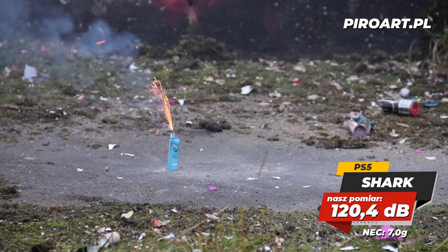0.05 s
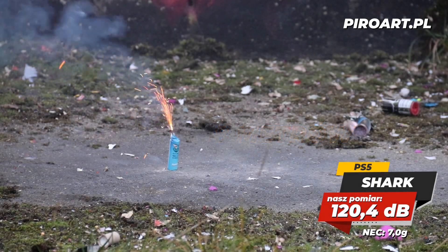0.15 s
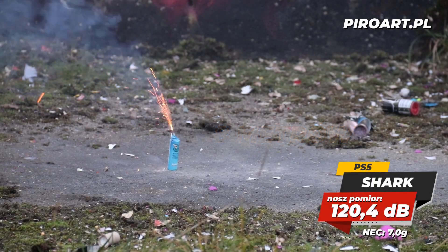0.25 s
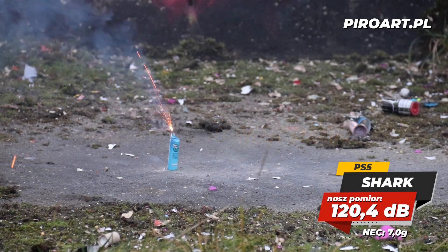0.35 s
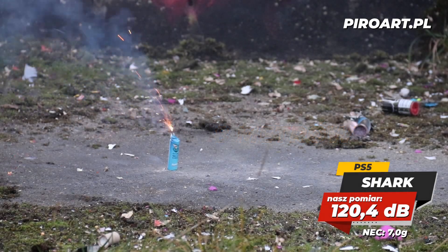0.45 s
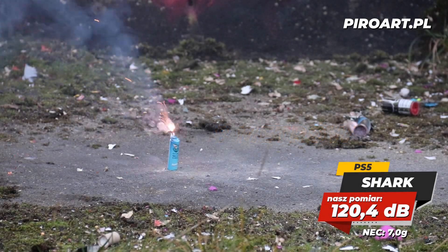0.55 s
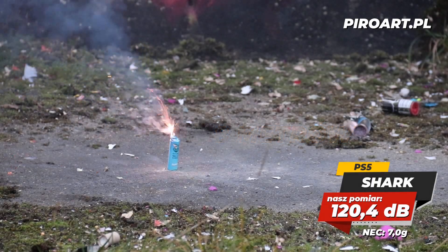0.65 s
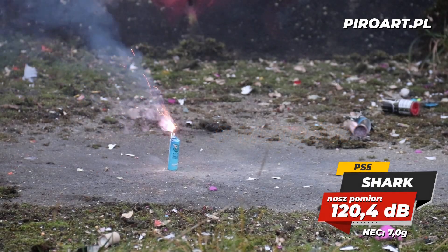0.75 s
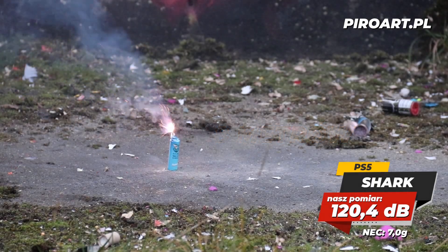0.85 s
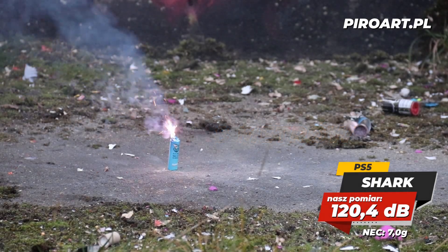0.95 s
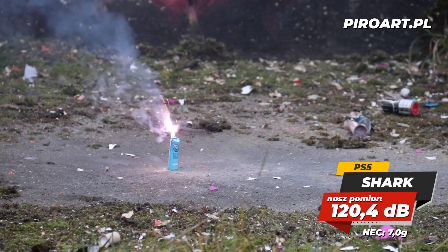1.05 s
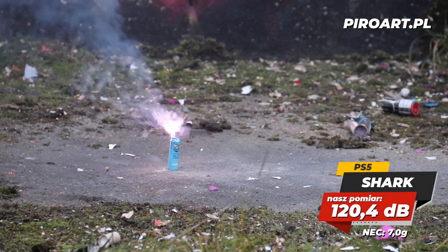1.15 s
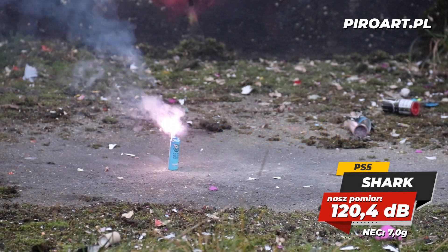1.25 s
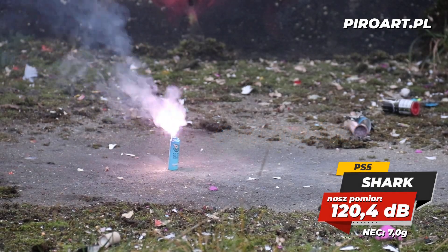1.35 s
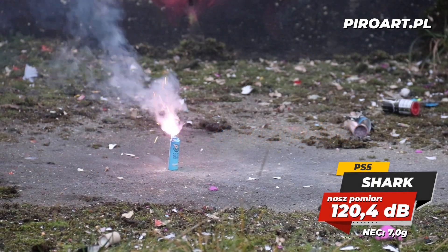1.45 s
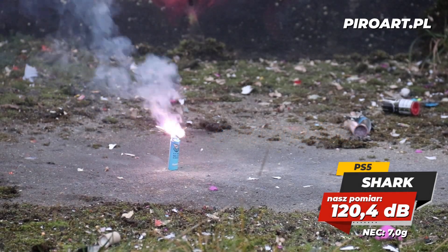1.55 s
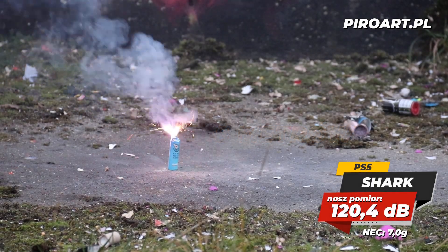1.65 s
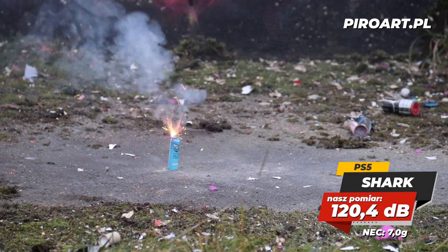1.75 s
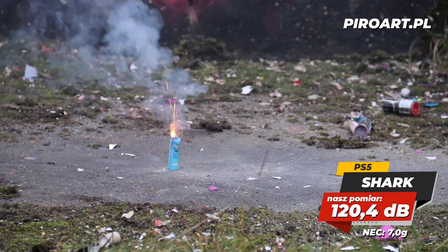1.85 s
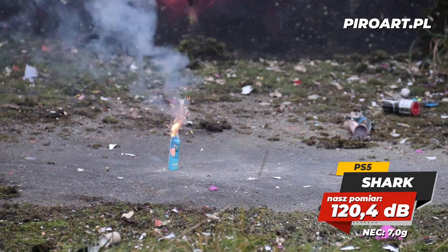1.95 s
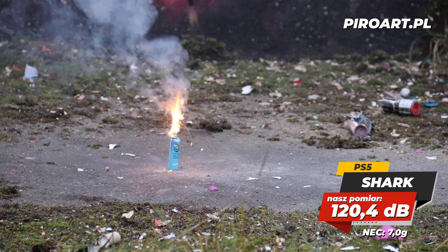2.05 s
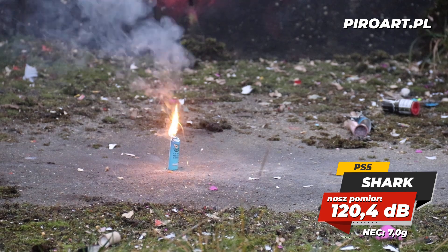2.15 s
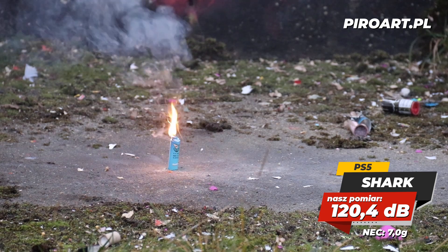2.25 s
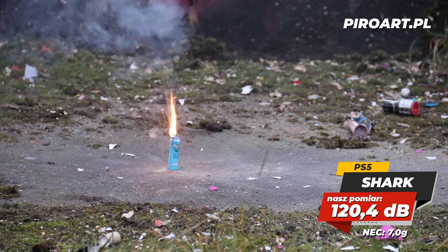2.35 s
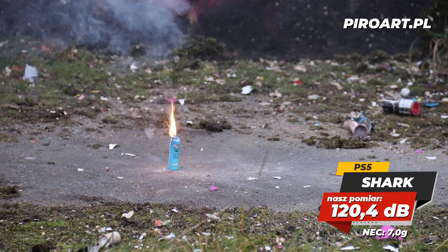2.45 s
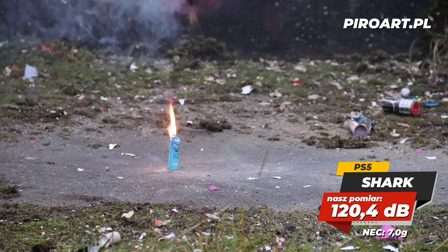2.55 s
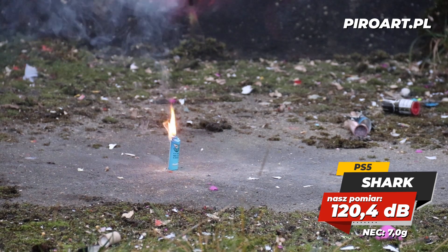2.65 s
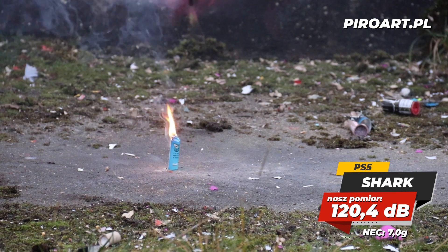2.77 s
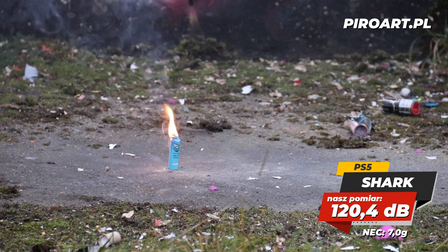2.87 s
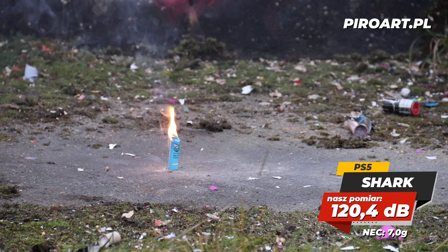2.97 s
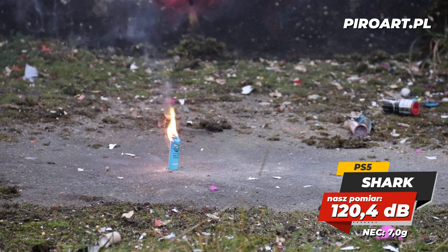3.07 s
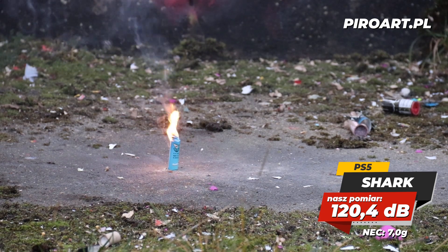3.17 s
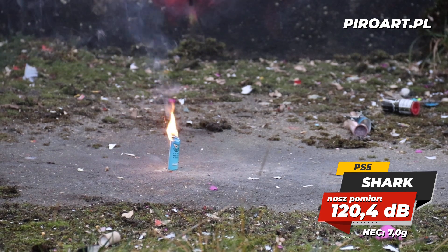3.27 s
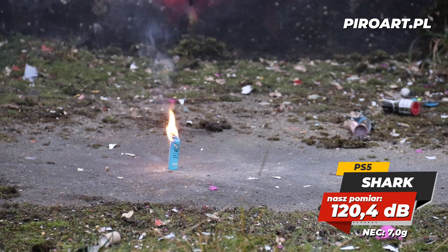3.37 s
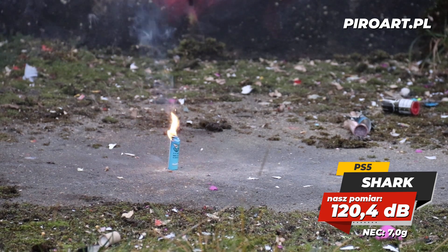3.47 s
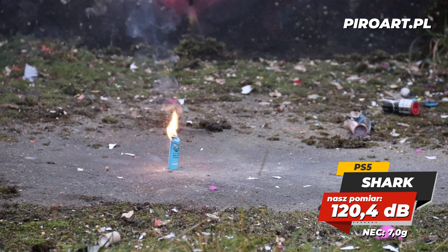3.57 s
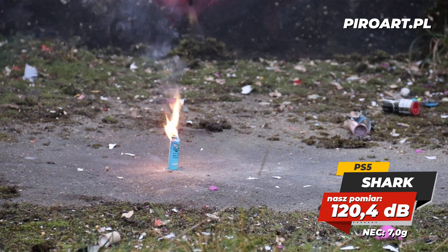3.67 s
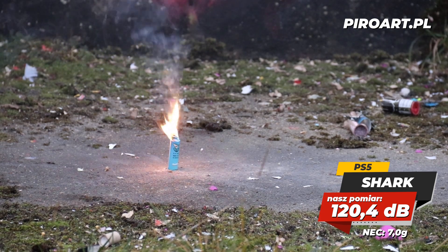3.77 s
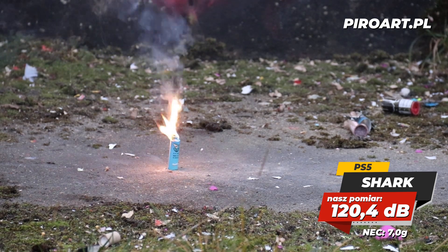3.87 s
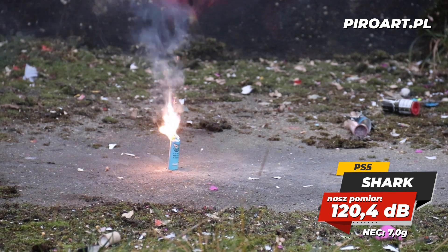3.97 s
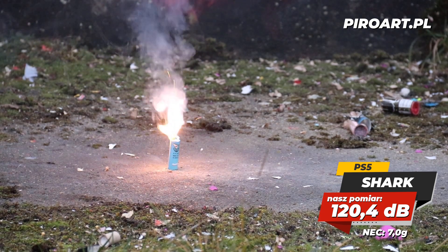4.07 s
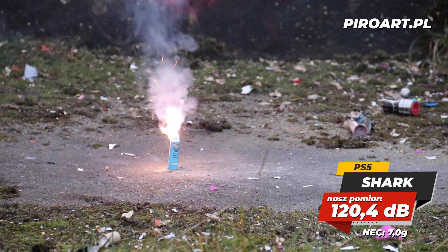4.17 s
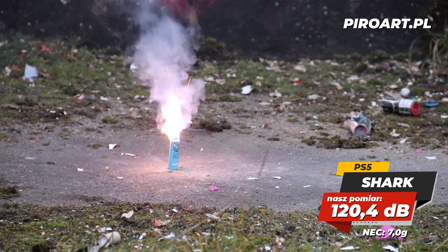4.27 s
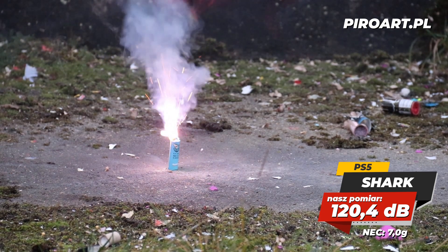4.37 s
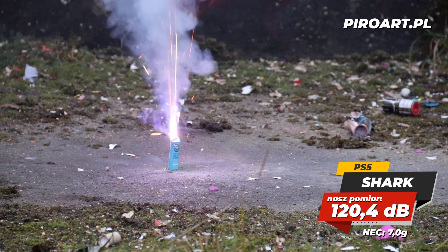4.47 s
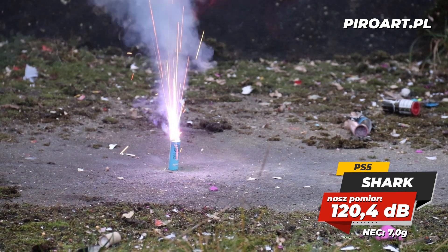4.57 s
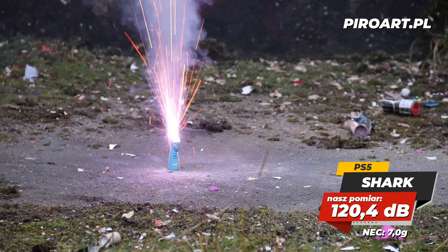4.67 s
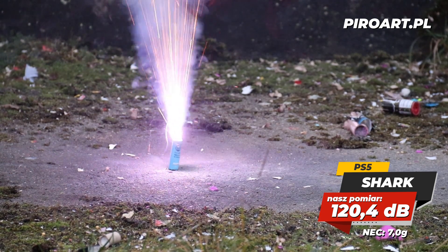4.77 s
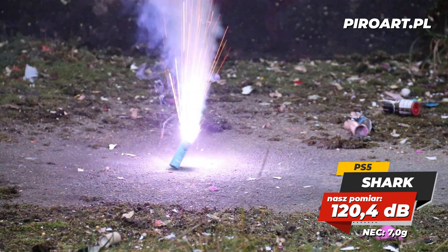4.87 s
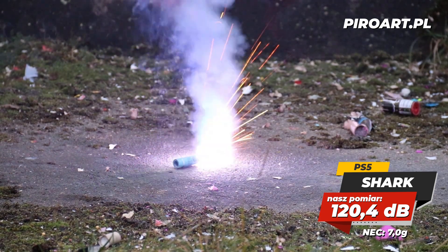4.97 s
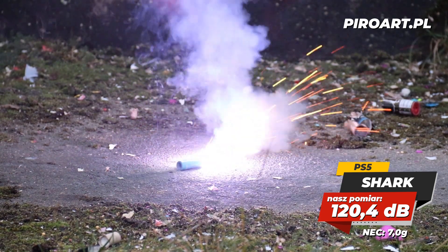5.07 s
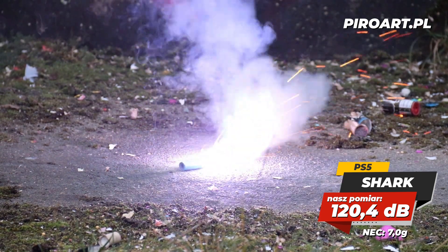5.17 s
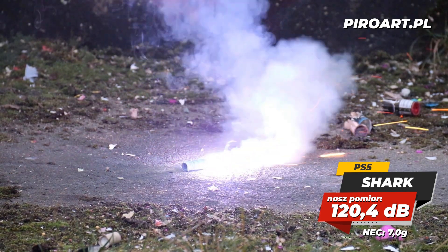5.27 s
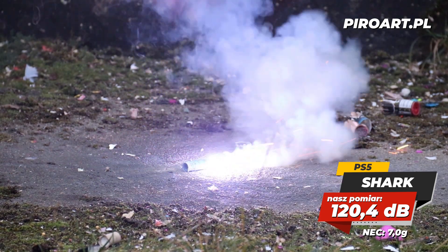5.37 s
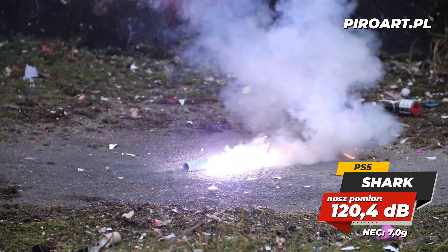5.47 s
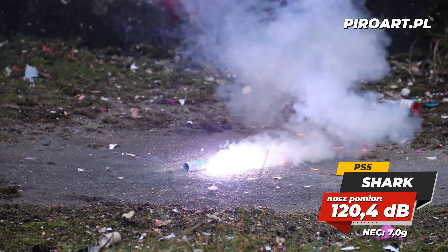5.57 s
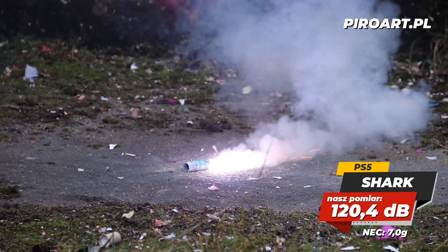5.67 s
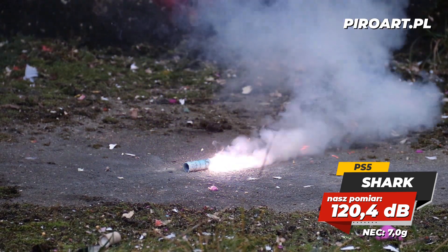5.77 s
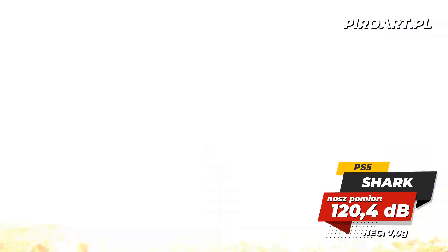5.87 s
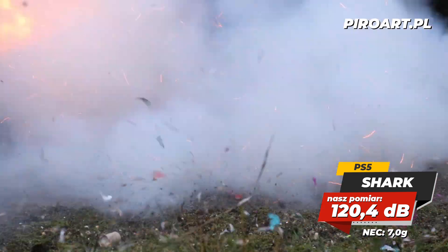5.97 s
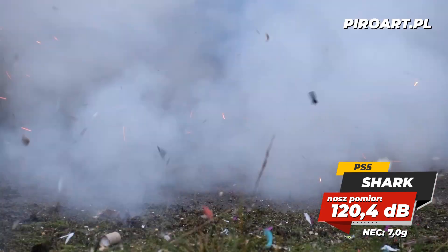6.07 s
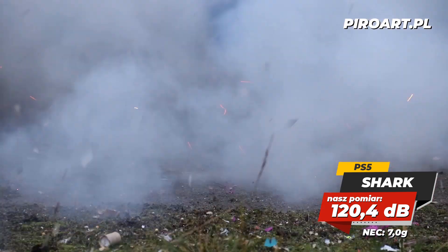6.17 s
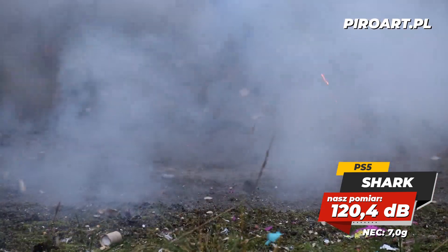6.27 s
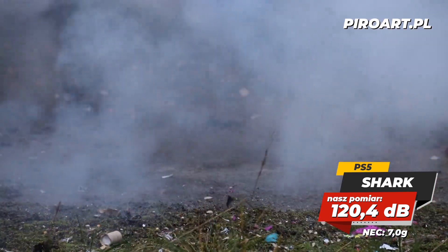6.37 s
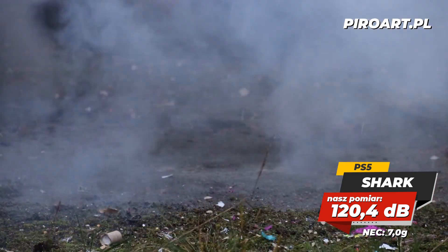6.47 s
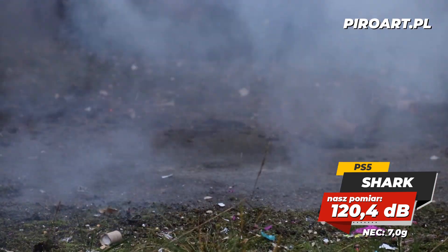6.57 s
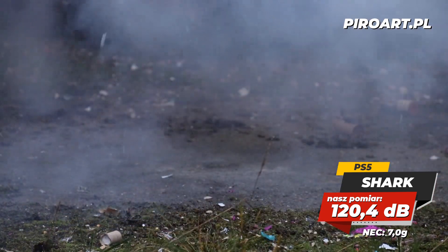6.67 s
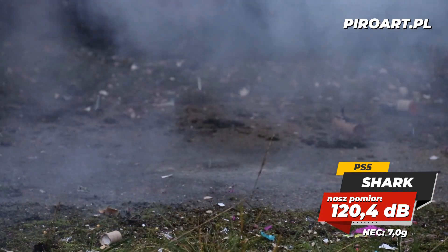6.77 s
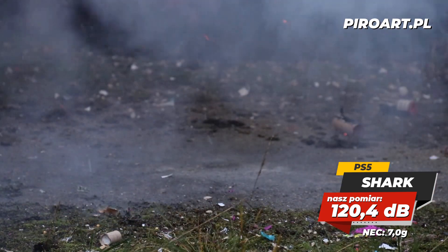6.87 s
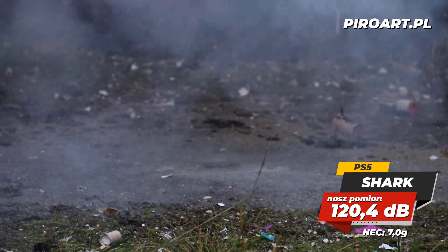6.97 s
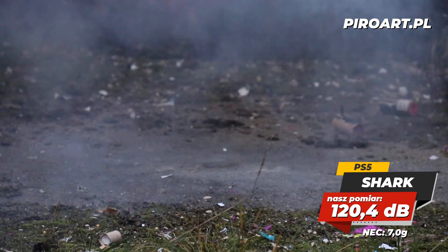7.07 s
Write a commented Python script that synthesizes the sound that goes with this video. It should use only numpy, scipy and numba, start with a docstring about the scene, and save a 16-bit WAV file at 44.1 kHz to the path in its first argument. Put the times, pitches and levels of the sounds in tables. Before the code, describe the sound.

A fuse sputters and hisses, sinks low, revives, then flares into a roaring jet before one enormous, distorted bang and echoes rolling outdoors.

```python
"""A firecracker stands on pavement in front of a wall: its fuse, band-split noise, sputters, spits and ticks.
The fuse sinks to a small flame, revives, then flares into a roaring jet that tips the tube over.
The charge explodes as a volley of pressure shocks with noisy cracks; the blast overloads the microphone and
the gain control ducks. Echoes roll back from far buildings and trees as surges of dark and clattering noise.
Faint outdoor air and microphone hiss lie underneath."""
import sys
import numpy as np
from scipy import signal
from scipy.fft import rfft, irfft, next_fast_len
from scipy.io import wavfile
from scipy.ndimage import uniform_filter1d, map_coordinates
from numba import njit

SR = 44100
rng = np.random.default_rng(int(sys.argv[2]) if len(sys.argv) > 2 else 0)


def inscribe(sig):
    """Save sig as 16-bit PCM at rate SR to the path in sys.argv[1].

    A 1-D sig is mono; a 2-D sig holds one channel per row.
    Samples are clipped to [-1, 1] before scaling.
    """
    pcm = np.round(np.clip(np.atleast_2d(sig).T, -1, 1) * 32767)
    wavfile.write(sys.argv[1], SR, pcm.astype(np.int16))


N = 314513

# the shock and its reflections from nearby walls: (start_s, relative level_db, crack_t60_s)
SHOCKS = [(5.9919, 17.5, 0.036), (5.999, 13, 0.014), (6.005, 13.5, 0.016), (6.019, 7.5, 0.021),
          (6.034, 14.5, 0.03), (6.041, 8.5, .03), (6.064, 11, 0.023), (6.09, -1.5, 0.031),
          (6.117, -3.5, 0.026), (6.14, -6, 0.06)]
BLAST_S = SHOCKS[0][0]
# colour of the boom in the yard and in the echoes: (freq_hz, relative level_db per Hz)
BOOM_COLOUR = [(40, -32.5), (110, -9), (155, -0.5), (175, -6.5), (195, 2.5), (215, -4), (250, 1.5),
               (330, -7), (430, -11.5), (520, -22.5), (900, -25), (3000, -74)]


def amp(db):
    """Decibels to gain."""
    return 10 ** (np.asarray(db) / 20)


def unit(x):
    """Scale to rms 1."""
    return x / np.sqrt(np.mean(x ** 2) + 1e-20)


def clock():
    """The time of every sample in seconds."""
    return np.arange(N) / SR


def gain_along(points, hz):
    """Gain of (freq_hz, level_db) points joined on a log frequency axis."""
    point_hz, db = np.transpose(points)
    return amp(np.interp(np.log(hz + 1), np.log(point_hz + 1), db))


def curves(rows):
    """One value per sample for each column after the time."""
    s, *columns = np.transpose(rows)
    return [np.interp(clock(), s, column) for column in columns]


def wobble(rate):
    """A smooth random curve, rate knots a second."""
    knots = rng.standard_normal(int(N * rate / SR) + 4)
    return map_coordinates(knots, [clock() * rate])


def ramp(start_s, length_s):
    """A straight rise from 0 to 1 over length_s."""
    return np.clip((clock() - start_s) / length_s, 0, 1)


def fade(start_s, t60_s):
    """Silence until start_s, then an exponential decay from 1."""
    age = clock() - start_s
    return (age >= 0) * amp(-60 * np.abs(age) / t60_s)


def swell(peak_s, rise_db_per_s, fall_db_per_s):
    """A gain that climbs to 1 at peak_s and sinks again."""
    age = clock() - peak_s
    return amp(-np.abs(age * np.where(age < 0, rise_db_per_s, fall_db_per_s)))


def filtered(x, response):
    """x shaped by a response of frequency, with padding for its tail."""
    size = next_fast_len(N + SR // 2)
    spectrum = rfft(x, size) * response(np.fft.rfftfreq(size, 1 / SR))
    return irfft(spectrum, size)[..., :N]


def noise(colour):
    """Coloured noise of rms 1."""
    return unit(filtered(rng.standard_normal(N), lambda hz: gain_along(colour, hz)))


def band(x, lo, hi):
    """One softly edged band of x, held near rms 1 over a quarter of a second."""
    y = filtered(x, lambda hz: 1 / (1 + (hz / hi) ** 10) - 1 / (1 + (hz / lo) ** 10))
    return y / np.sqrt(np.abs(uniform_filter1d(y ** 2, size=SR // 4)) + 1e-20)


def delayed(x, lag_rows):
    """x behind a moving lag, given as (time_s, lag_ms) rows."""
    lag_ms = curves(lag_rows)[0]
    return map_coordinates(x, [np.arange(N) - lag_ms * SR / 1000])


def widen(x, width):
    """Scattered sound, opposite in left and right, opens the stereo width frequency by frequency."""
    scatter = unit(rng.standard_normal(512)) / np.sqrt(512)  # unit energy
    scattered = signal.fftconvolve(x, scatter)[:N]
    side = filtered(scattered, lambda hz: gain_along(width, hz))
    return np.array([x + side, x - side])


def background(air_db, hiss_db):
    """Faint outdoor air, and the microphone's own hiss, unrelated between the channels."""
    # colour of the outdoor air: (freq_hz, relative level_db per Hz)
    air_colour = [(15, -34), (25, -11), (55, 2), (174, 1.5), (247, -1), (351, -1.5), (460, -3.5),
                  (586, -1.5), (2190, -9.5), (2800, -5), (4800, -16), (11100, -20.5), (15700, -22)]
    hiss_colour = [(100, 6), (2000, -8), (6000, -6.0), (15000, 3)]
    hiss = np.array([noise(hiss_colour) for channel in range(2)])
    return amp(air_db) * noise(air_colour) + amp(hiss_db) * hiss


def band_levels(strength_db, usual_db, before, after, change):
    """Roar, rush, hiss and fizz (dB) as a flame passes between two states; its strength drives the rush."""
    # moments when the fire sizzles brighter: (peak_s, gain_db, rise_db_per_s, fall_db_per_s)
    sizzle_rows = [(1.9, 5.5, 21, 28), (4.22, 3.5, 92, 90), (4.801, 10, 114, 73)]
    # share of that gain, one number (0 to 1) each for roar, rush, hiss, fizz
    sizzle_share = (0.023, 0.14, 0.7, 1)

    def follow_strength(state):
        return np.array([db + growth * (strength_db - usual_db) for db, growth in state])

    roar, hiss, fizz = (1 - change) * follow_strength(before) + change * follow_strength(after)
    sizzle_db = sum(db * swell(s, rise, fall) for s, db, rise, fall in sizzle_rows)
    return np.array([roar, strength_db, hiss, fizz]) + np.outer(sizzle_share, sizzle_db)


def flame(gas, levels, flutter_db, sputter_db):
    """Turbulent gas: the whole flame flutters, and grains of powder make its upper bands sputter."""
    # edges of roar, rush, hiss and fizz: edge_hz
    edges_hz = [10, 900, 4200, 11000, 24000]
    flutter = flutter_db * wobble(45)
    sputter = sputter_db * wobble(700)
    total = 0
    for level_db, lo, hi in zip(levels, edges_hz, edges_hz[1:]):
        motion_db = flutter + (lo > edges_hz[0]) * sputter
        total += amp(level_db) * unit(band(gas, lo, hi) * amp(motion_db))
    return total


def sparks(hiss_db, rate, level_db):
    """Tiny snaps of flying sparks, rate a second on average, following the fuse's hiss."""
    colour = [(400, -27), (2500, 14), (8000, -12), (15000, -10)]
    snaps = (rng.random(N) < rate / SR) * rng.exponential(size=N)
    snaps = filtered(snaps, lambda hz: gain_along(colour, hz))
    return amp(hiss_db + level_db) * unit(snaps)


def fuse(cap_reflection, enter_s, enter_length_s):
    """The cap's echo notches the hiss, climbing as the fuse shortens; inside the tube the fizz is muffled."""
    # colour of the fuse: (freq_hz, relative level_db per Hz)
    fuse_colour = [(30, -20), (70, -13), (150, -1), (300, 1), (600, -2.5), (950, -5), (1700, -1), (3400, 3),
                   (3900, -7.5), (4600, -10.5), (5700, -9), (8200, -10.5), (11300, -13), (14500, -10)]
    # lag of the echo off the tube's cap, shrinking as the fire burns down: (time_s, lag_ms)
    cap_lag = [(0, 0.15), (1.4, 0.13), (1.95, 0.11), (2.5, 0.09), (3.0, .062), (3.4, 0.05), (4.43, 0.027)]
    # how fiercely the fuse burns: (time_s, strength_db)
    burn_rows = [(0.0, -43), (0.73, -48), (0.78, -45.5), (1.33, -50.5), (1.37, -47), (1.87, -50),
                 (2.05, -48.5), (2.41, -61.5), (3.11, -62), (3.28, -50), (3.59, -54.5), (4.02, -53),
                 (4.06, -47.5), (4.24, -49.5), (4.43, -44)]
    # roar, hiss and fizz against strength: (level_db at usual strength, growth_db per dB)
    in_open = [(-49.5, 1.03), (-50.5, 1.0), (-55, 0.2)]
    in_tube = [(-49.5, 2), (-50, 0.64), (-72, 0.2)]
    small_flame_db = -61.5  # what stays when the fuse sinks
    gas = noise(fuse_colour)
    gas = gas + cap_reflection * delayed(gas, cap_lag)
    burn_db = 20 * np.log10(np.hypot(amp(curves(burn_rows)[0]), amp(small_flame_db)))
    inside = ramp(enter_s, enter_length_s)
    levels = band_levels(burn_db, -45, in_open, in_tube, inside)  # usual strength -45 dB
    return flame(gas, levels, flutter_db=0.9, sputter_db=1.04) + sparks(levels[2], rate=140, level_db=-21.5)


def spits(hiss_trim_db, puff_trim_db, attack_share):
    """Pockets of powder catch at once: a short hiss on a low puff."""
    # spits of burning powder, levels before trim: (start_s, hiss_db, puff_db, t60_s)
    spit_rows = [(0.752, -25, -41, 0.15), (0.82, -31, -38, .14), (0.925, -26, -28, 0.31),
                 (1.33, -41, -38.5, 1.44), (2.047, -26.5, -53, 0.12), (3.255, -31, -52, .35),
                 (3.43, -31, -55, 0.12), (4.1, -29, -49, .14), (4.152, -32, -31.5, .16),
                 (4.182, -25, -47, 0.1), (4.25, -31.5, -30.5, 0.6), (4.37, -26, -36, 0.13),
                 (4.44, -25, -25.5, .4), (5.152, -32, -22, 0.1), (5.205, -12, -23.5, 0.099),
                 (5.482, -9.5, -33.5, 0.18), (5.515, -28, -22, 0.29), (5.654, -25, -25, .14)]
    hiss = noise([(300, -25), (1500, 6), (3200, 6.5), (4400, -8.0), (8500, 0), (11000, -16.5), (15700, -32)])
    puff = noise([(50, -26), (120, 3.5), (300, 7.5), (650, -0.5), (1200, -16), (5000, -47.5)])
    total = 0
    for s, hiss_db, puff_db, t60 in spit_rows:
        envelope = ramp(s, attack_share * t60) * fade(s, t60)
        total += envelope * (amp(hiss_db + hiss_trim_db) * hiss + amp(puff_db + puff_trim_db) * puff)
    return total


def pops(trim_db, t60_s):
    """Single grains of powder burst with a dry tick."""
    # grains that pop sharply, levels before trim: (start_s, level_db)
    pop_rows = [(0.8254, -29), (1.4104, -40), (1.428, -41), (1.448, -35), (4.0686, -30), (4.167, -26),
                (4.1867, -27), (4.329, -27), (4.376, -32), (4.3982, -34)]
    tick = noise([(300, -16), (2500, 9), (4400, -14), (7500, 6), (10000, -17), (15000, -28.5)])
    return tick * sum(amp(db + trim_db) * fade(s, t60_s) for s, db in pop_rows)


def wall(x, reflection):
    """The wall's delayed echo combs the sound; its comb shifts upward as the tube falls, then settles."""
    # lag of the wall's echo, shorter once the tube tips over: (time_s, lag_ms)
    wall_lag = [(0, 7.75), (4.85, 7.71), (5.0, 7.45), (5.1, 7.17), (5.3, 7.38), (5.5, 7.46), (6, 7.46)]
    wall_colour = [(100, -4), (1000, -0.5), (3000, 1.0), (6000, -8.0), (14000, -15)]
    echo = filtered(x, lambda hz: gain_along(wall_colour, hz))
    return (x + reflection * delayed(echo, wall_lag)) / np.sqrt(1 + reflection ** 2)


def thrust(start_s):
    """Strength of the jet in dB: it builds, holds, and sinks steadily as the powder is spent."""
    attack_s, hold_s = 0.41, 0.14
    peak_db, sag_db_per_s = -20, 28
    built = np.maximum(ramp(start_s, attack_s), 0.01) ** 0.7  # steep at first, then easing
    spent_s = np.maximum(clock() - start_s - attack_s - hold_s, 0)
    return peak_db + 20 * np.log10(built) - sag_db_per_s * spent_s


def jet(start_s, fall_s, fall_length_s):
    """The jet brightens with its thrust, then dulls as that thrust tips the tube over."""
    # colour upright, and with the tube on its side: (freq_hz, relative level_db per Hz)
    upright_colour = [(40, -32), (125, -1), (300, 6), (660, 7), (950, -7), (1600, -3), (2750, -0.5),
                      (3450, -1), (3850, -9), (4600, -11), (5700, -7), (9300, -10), (10700, -17.5),
                      (15700, -21)]
    fallen_colour = [(40, -27), (130, -0.5), (300, 4.5), (660, 4), (950, -1.5), (1600, -0.5), (3000, -0.5),
                     (3800, -10.5), (5000, -17), (9000, -18.5), (12500, -30), (15700, -43)]
    # roar, hiss and fizz against strength: (level_db at usual strength, growth_db per dB)
    upright_law = [(-33, 0.67), (-32.5, 1.13), (-44, 2)]
    fallen_law = [(-28, 0.76), (-37.5, 0.51), (-48.5, 0.3)]
    fallen = ramp(fall_s, fall_length_s)
    tilt = np.pi / 2 * fallen  # equal-power crossfade of the two colours
    gas = np.cos(tilt) * noise(upright_colour) + np.sin(tilt) * noise(fallen_colour)
    levels = band_levels(thrust(start_s), -25, upright_law, fallen_law, fallen)  # usual strength -25 dB
    return flame(gas, levels, flutter_db=0.84, sputter_db=1.0)


def burning():
    """The fuse hands over to the jet, which burns until the charge goes off."""
    # width of the fuse's hiss: (freq_hz, side_minus_mid_db)
    fuse_width = [(60, -3), (110, -31), (200, -43), (380, -43), (700, -36), (1290, -48), (2380, -77),
                  (4400, -11), (8120, -14), (15000, -2.5)]
    jet_start_s = 4.4274
    flared = ramp(jet_start_s, 0.024)
    small = (1 - flared) * fuse(cap_reflection=0.39, enter_s=2.4, enter_length_s=1.0)
    small += pops(trim_db=-7, t60_s=0.011)
    large = flared * jet(jet_start_s, fall_s=4.85, fall_length_s=0.21)
    large += spits(hiss_trim_db=-14, puff_trim_db=-6.0, attack_share=0.062)
    both = widen(wall(small, reflection=0.57), fuse_width) + wall(large, reflection=0.62)
    return both * (clock() < BLAST_S)


def blast(push_s, crack_db, boom_db, boom_t60_s, burst_db):
    """The tube bursts; each shock is a pressure jump, a longer suction and a crack; the yard booms after."""
    crack = noise([(200, 2.5), (1000, 4.5), (2500, 7), (4000, -6), (7000, -14), (15000, -36)])
    tearing = ramp(BLAST_S - 0.0038, 0.0038) * (clock() < BLAST_S)  # swells just before the shock
    rip = noise([(500, -2.5), (9000, -2), (12000, -17), (15000, -36)])
    pressure = amp(burst_db) * tearing ** 2 * (0.6 + rip)  # 0.6 is a steady push under the rip
    pressure += amp(boom_db) * fade(BLAST_S, boom_t60_s) * noise(BOOM_COLOUR)
    for s, db, t60 in SHOCKS:
        u = np.maximum(clock() - s, 0) / push_s
        push = (u > 0) * (1 - u) * np.exp(-u)
        pressure += amp(db) * (push + amp(crack_db) * fade(s, t60) * crack)
    return pressure


def echo_gains():
    """Boom, rumble, clatter: the yard dies away, the trees answer late, each building adds a surge."""
    # distinct echoes off far buildings, relative levels: (peak_s, boom_db, rumble_db)
    building_rows = [(6.1, 4, -10), (6.272, -3, -30), (6.378, -2, -12), (6.441, -3, -18), (6.49, -11, -9.5),
                     (6.55, -10, -8), (6.61, -9, -8.5), (6.7, -26, -7.5), (6.86, -32, -20)]
    # diffuse roll of the yard and of the far trees, relative levels: boom_db, rumble_db, clatter_db
    yard_levels = (0.5, 4, -0.5)
    tree_levels = (-15, -20, -16.5)
    # decay of the yard: boom_t60_s, rumble_t60_s, clatter_t60_s
    yard_decays = (0.8, 0.39, 0.63)
    clatter_db = -16.5  # a building's clatter against its boom
    trees = swell(6.675, rise_db_per_s=21.5, fall_db_per_s=36)
    power = np.array([(amp(yard_db) * fade(BLAST_S, t60)) ** 2 + (amp(trees_db) * trees) ** 2
                      for yard_db, t60, trees_db in zip(yard_levels, yard_decays, tree_levels)])
    for s, boom_db, rumble_db in building_rows:
        surge = swell(s, rise_db_per_s=450, fall_db_per_s=398)
        power += np.outer(amp([boom_db, rumble_db, boom_db + clatter_db]), surge) ** 2
    return np.sqrt(power)


def echoes(air_loss_db, patchy_db, boom_trim_db, rumble_trim_db, clatter_trim_db):
    """Countless far reflections; the longer their path, the more treble the air has taken."""
    # colours of the echoes: (freq_hz, relative level_db per Hz)
    rumble_colour = [(20, -34), (42, -34), (58, -15.5), (70, -12), (84, 3.5), (103, -14.5), (125, 1.5),
                     (170, -6), (400, -74)]
    clatter_colour = [(150, -9), (450, 0.5), (700, 0.5), (1100, 0), (1500, -1.5), (2300, -4), (3200, -1.5),
                      (4000, -9), (5500, -15.5), (9000, -21.5), (15000, -26)]
    boom_gain, rumble_gain, clatter_gain = echo_gains()
    patchy = noise(clatter_colour) * amp(patchy_db * wobble(90))
    hz, t, frames = signal.stft(patchy, SR, nperseg=512)
    # air_loss_db is the loss at 10 kHz for each second of travel
    loss_db = air_loss_db * np.outer((hz / 10000) ** 2, np.maximum(t - BLAST_S, 0))
    clatter = signal.istft(frames * amp(-loss_db), SR, nperseg=512)[1][:N]
    total = amp(boom_trim_db) * boom_gain * noise(BOOM_COLOUR)
    total += amp(rumble_trim_db) * rumble_gain * noise(rumble_colour)
    total += amp(clatter_trim_db) * clatter_gain * clatter
    return (clock() > BLAST_S) * total


def scene():
    """Fuse, jet, bang and echoes over a quiet outdoor background."""
    # width of the bang: (freq_hz, side_minus_mid_db)
    bang_width = [(100, -75), (3000, -69), (4500, -50), (9000, -20.5), (15000, -9.5)]
    bang = blast(push_s=0.0014, crack_db=-5.5, boom_db=16.0, boom_t60_s=0.51, burst_db=-12)
    bang += echoes(air_loss_db=53, patchy_db=0.94, boom_trim_db=-1.5, rumble_trim_db=-0.5, clatter_trim_db=0.5)
    bang_master_db = 5  # lifts blast and echoes together
    quiet = background(air_db=-54.5, hiss_db=-64.0)
    return burning() + amp(bang_master_db) * widen(bang, bang_width) + quiet


@njit
def follow(size, attack, release):
    """An envelope that rises quickly and sinks slowly (times in samples)."""
    out, level = np.zeros(len(size)), 0.0
    for i in range(len(size)):
        level += (size[i] - level) / (attack if size[i] > level else release)
        out[i] = level
    return out


def overload(x, top, hardness):
    """Flatten everything beyond top; a greater hardness makes a sharper knee."""
    return x / (1 + np.abs(x / top) ** hardness) ** (1 / hardness)


def smear(x, flattening, share_db, t60_s):
    """Where the sound is flattened, a short burst of bright noise follows it, roughening the edges."""
    # width of the added bright noise: (freq_hz, side_minus_mid_db)
    smear_width = [(2500, -42), (4800, -4), (15000, 1)]
    t = np.arange(SR // 20) / SR
    tail = rng.standard_normal(len(t)) * amp(-60 * t / t60_s)
    burst = signal.fftconvolve((x * flattening).mean(axis=0), tail / np.linalg.norm(tail))[:N]
    bright = filtered(burst, lambda hz: hz / (hz + 1500))
    return x + amp(share_db) * widen(bright, smear_width)


def record(dry):
    """The microphone overloads, the gain control ducks a moment late, and the converter clips the rest."""
    flattened = overload(dry, top=1.47, hardness=4.1)
    level = follow(np.abs(flattened).max(axis=0), 0.006 * SR, .55 * SR)
    flattening = np.clip(uniform_filter1d(np.abs(dry - flattened), size=SR // 50), 0, 1)
    ducked = flattened / np.maximum(1, level / .35)  # ducks only above 0.35
    rough = smear(ducked, flattening, share_db=-10, t60_s=0.02)
    coupled = filtered(rough, lambda hz: 1j * hz / (22 + 1j * hz))  # a coupling capacitor tilts the flat tops
    clipped = overload(coupled, top=0.99, hardness=5.7)
    return filtered(clipped, lambda hz: hz < 15800)  # nothing above 15.8 kHz


dry = scene()
out = record(dry)
inscribe(out)
```